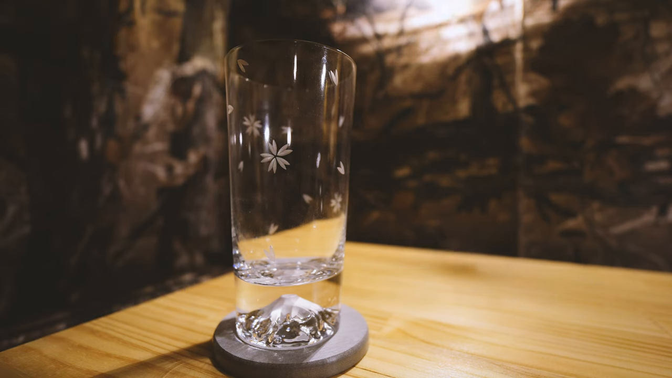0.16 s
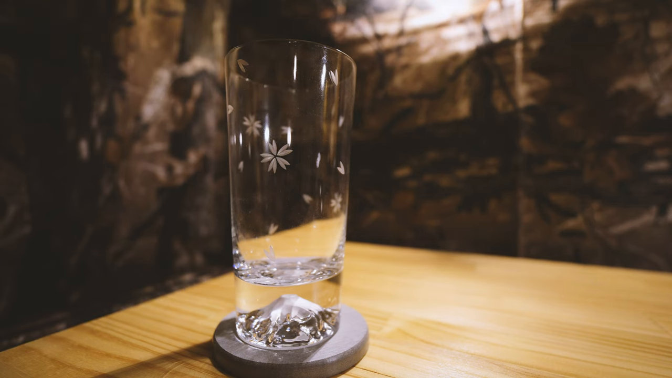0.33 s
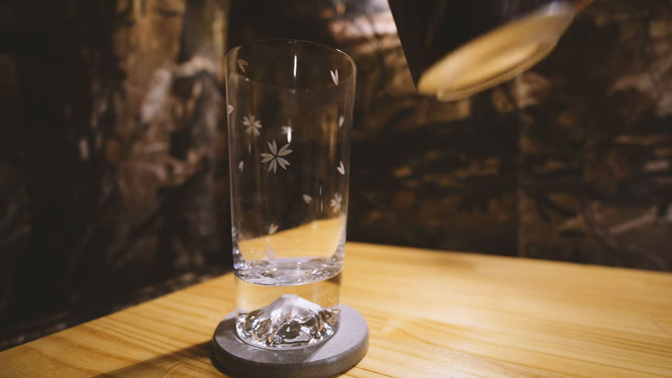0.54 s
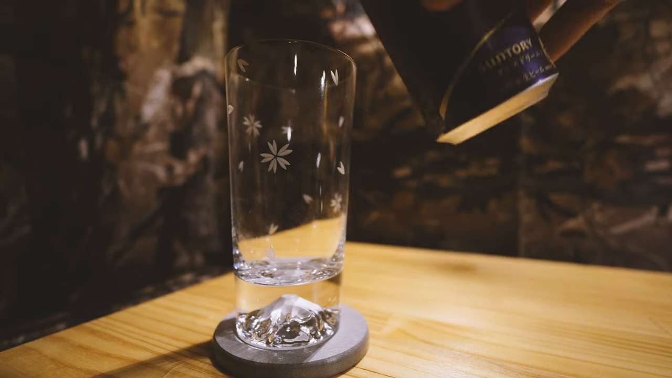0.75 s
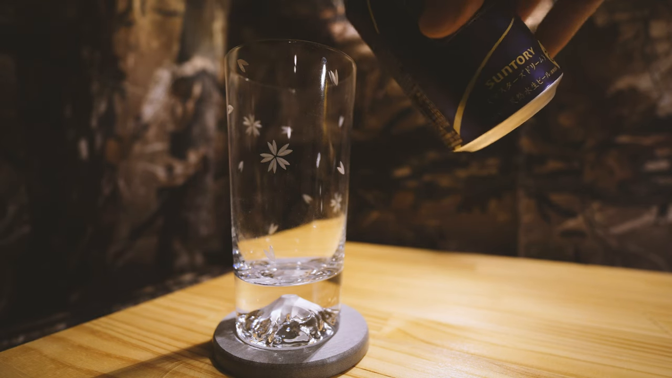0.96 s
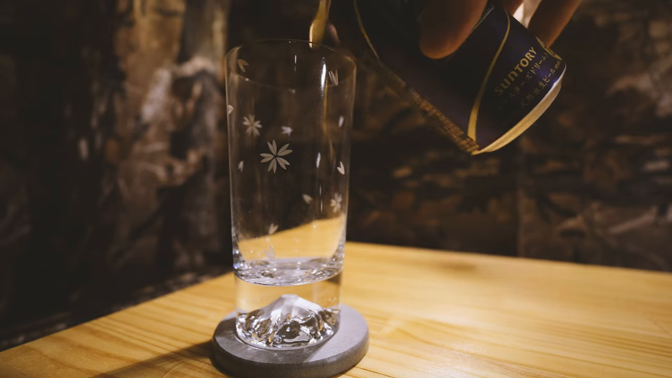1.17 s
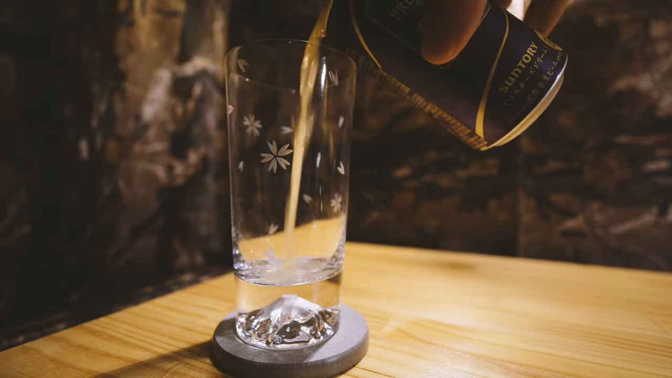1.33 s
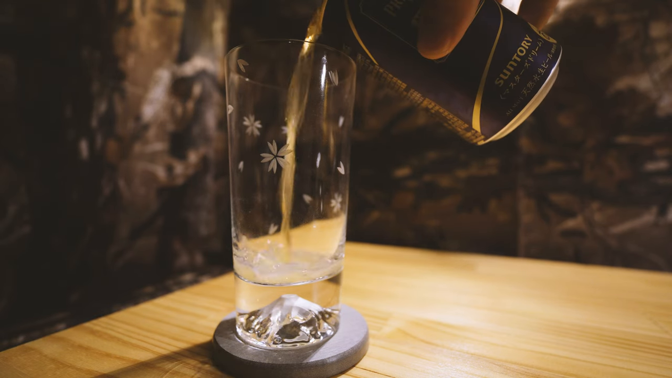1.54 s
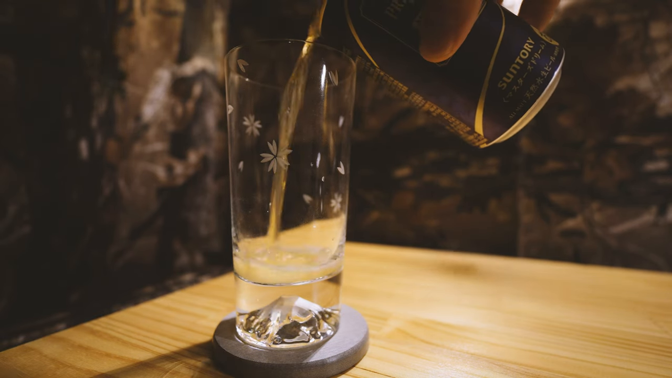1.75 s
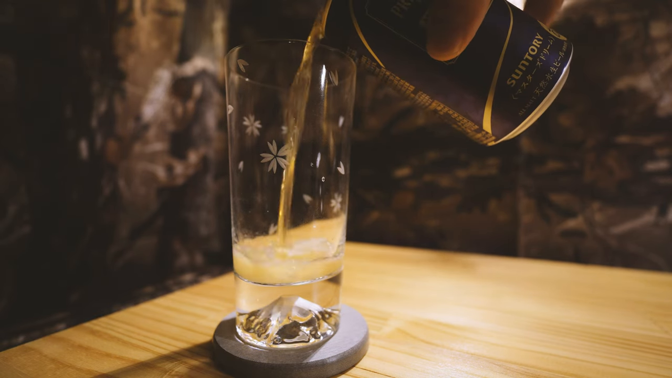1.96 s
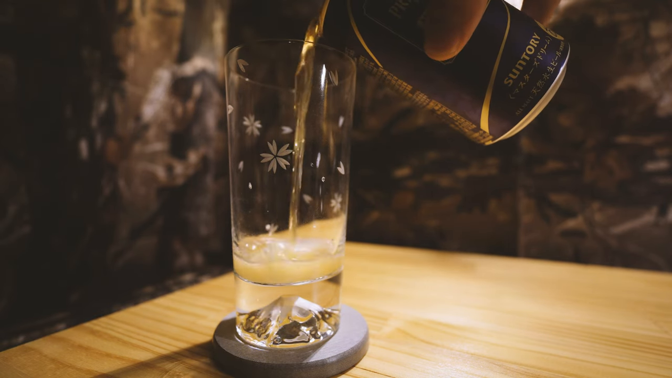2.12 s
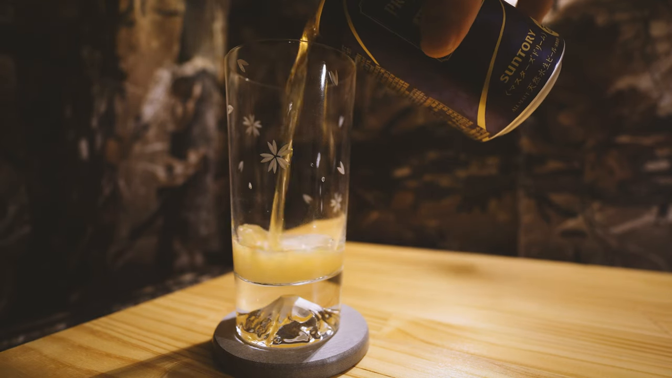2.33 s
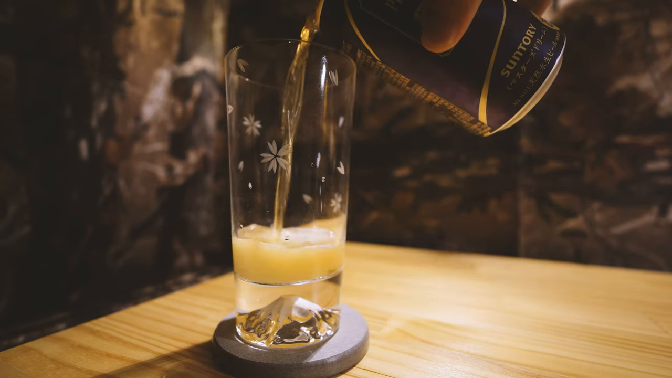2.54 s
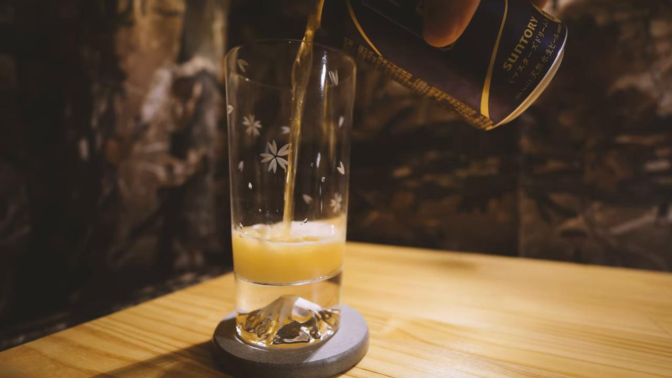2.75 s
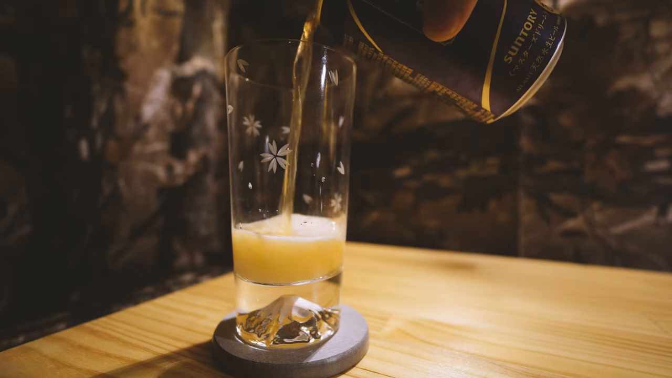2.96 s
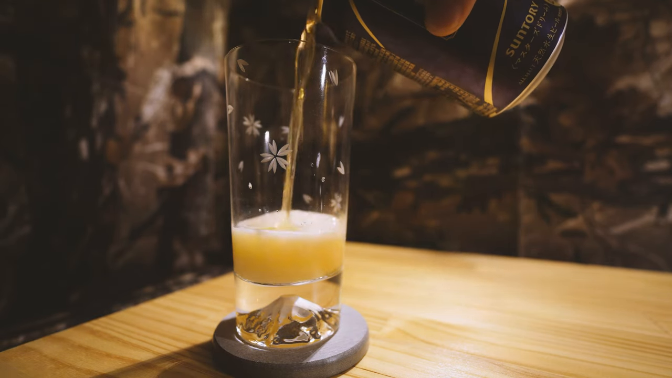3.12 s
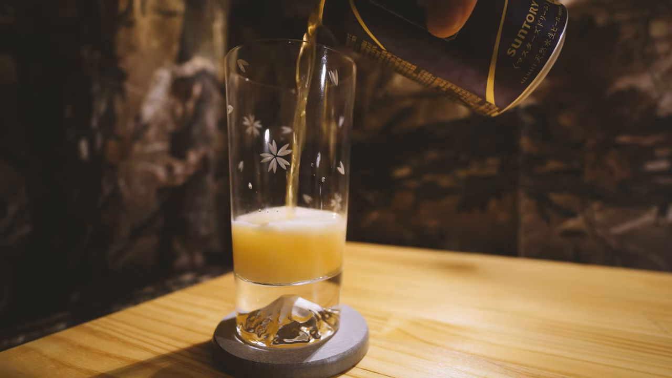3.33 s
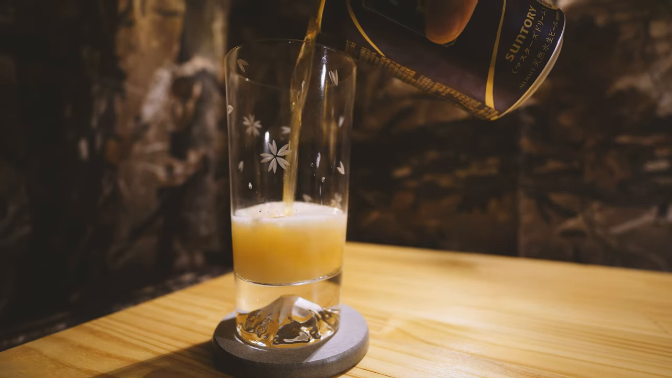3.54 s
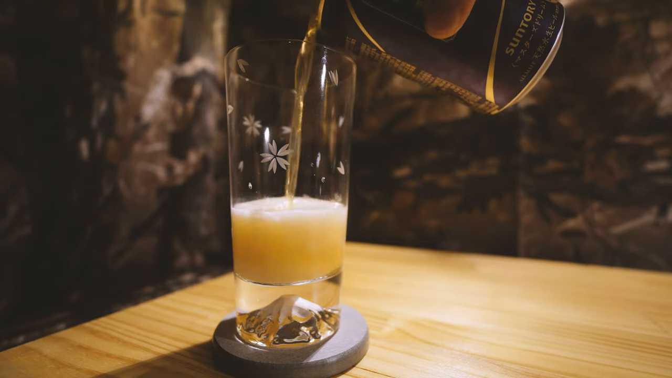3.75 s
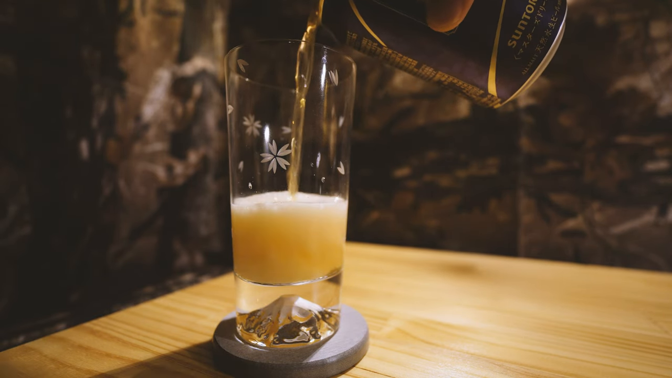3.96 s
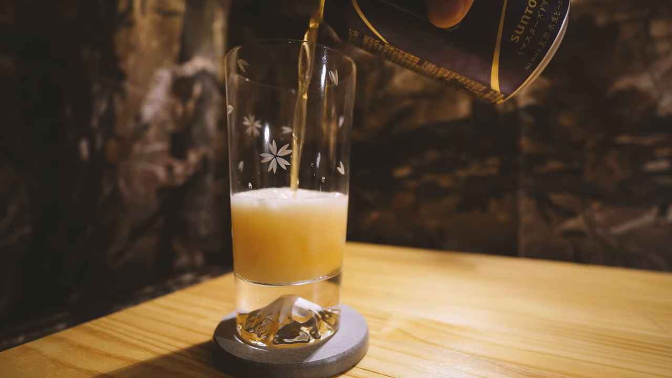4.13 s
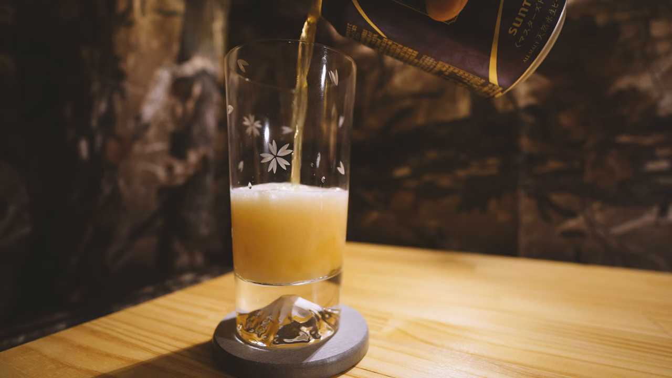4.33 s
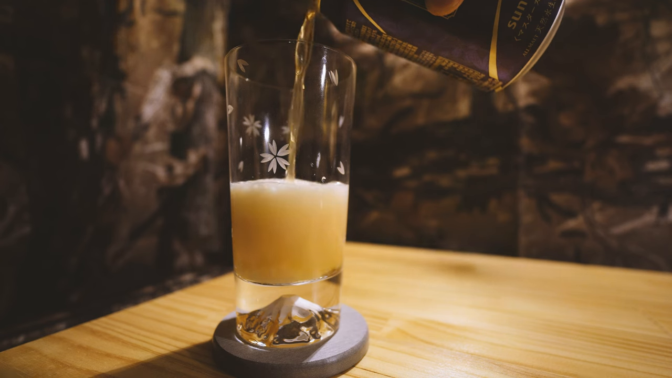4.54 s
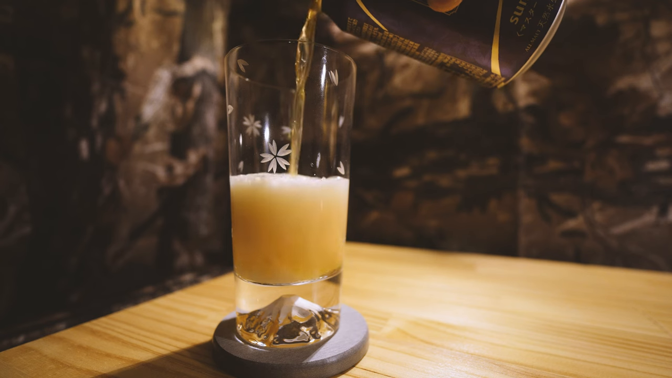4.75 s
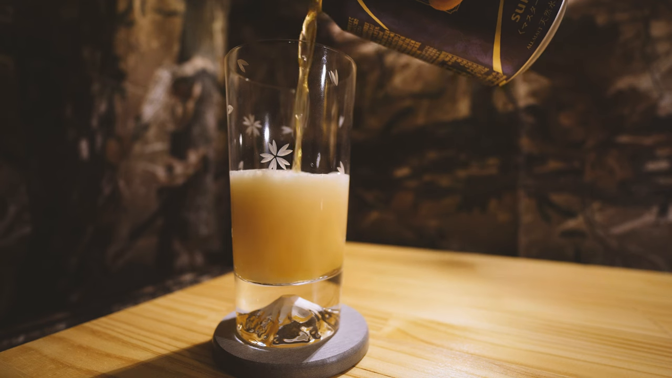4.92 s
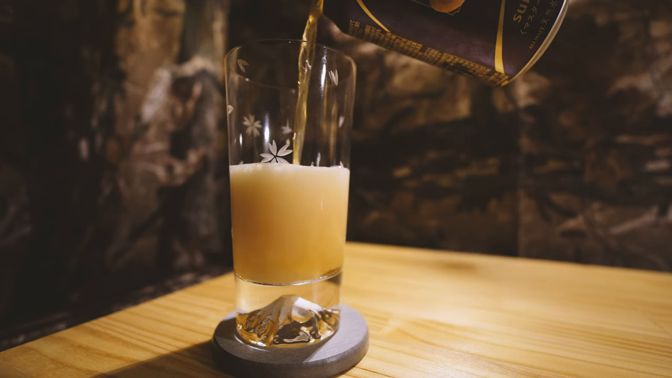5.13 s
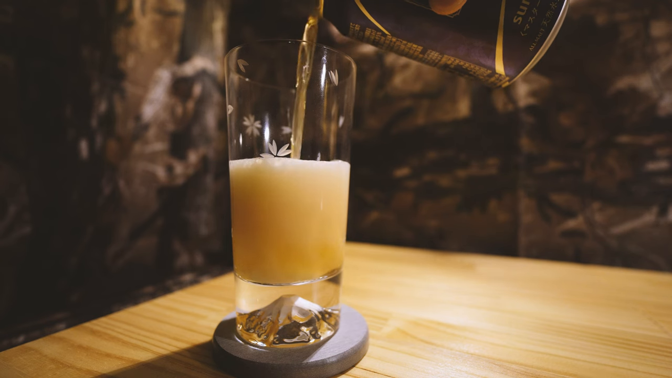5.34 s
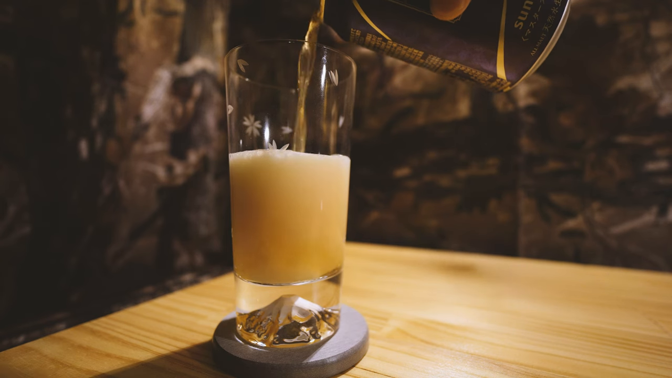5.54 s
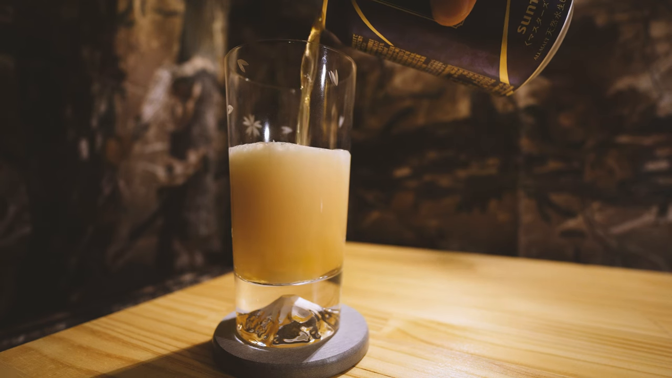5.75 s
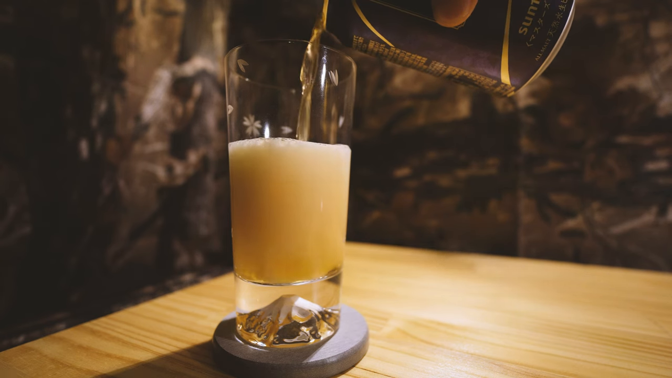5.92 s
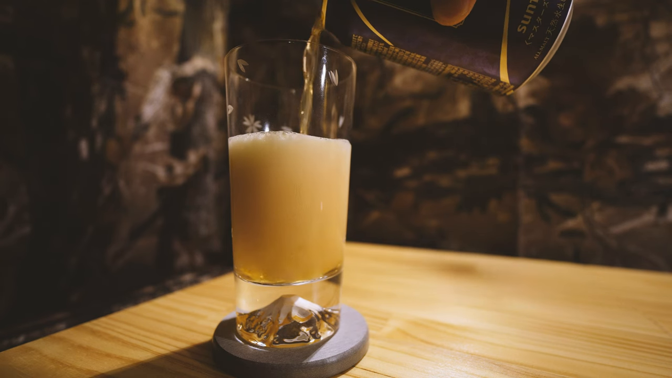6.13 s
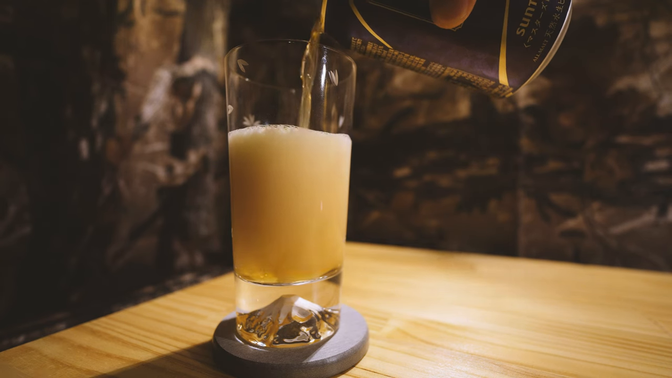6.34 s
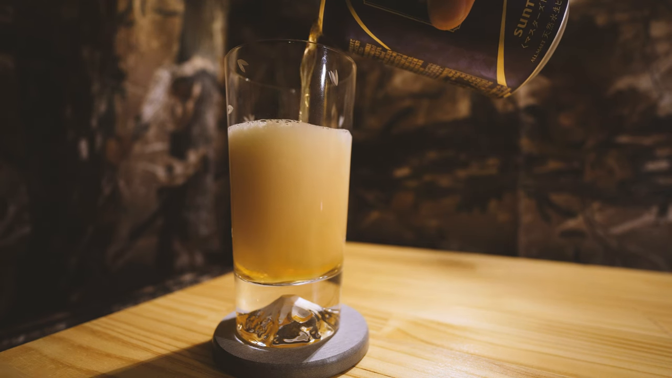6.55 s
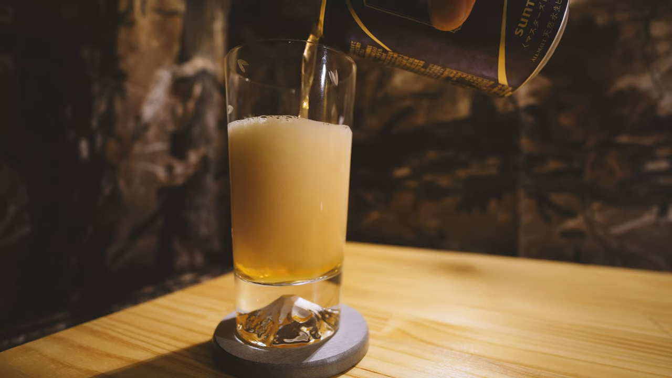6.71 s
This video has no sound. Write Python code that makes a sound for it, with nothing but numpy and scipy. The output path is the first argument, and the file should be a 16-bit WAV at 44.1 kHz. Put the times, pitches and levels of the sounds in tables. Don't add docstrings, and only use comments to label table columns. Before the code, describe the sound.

Beer from a can splashes onto a bare glass bottom, bubbles ring brightly, then soften into dull foamy pops in a small room.

```python
import sys
import numpy as np
from scipy import signal
from scipy.fft import rfft, irfft
from scipy.io import wavfile
from scipy.ndimage import uniform_filter1d

SR = 44100
rng = np.random.default_rng(int(sys.argv[2]) if len(sys.argv) > 2 else 0)


def wav_out(sig):
    wavfile.write(sys.argv[1], SR, np.round(np.clip(np.atleast_2d(sig).T, -1, 1) * 32767).astype(np.int16))


def invert_db(x):
    u = np.asarray(x, float) / 20
    return 10 ** u


N = 303401

# pitch_hz, level_db (per Hz)
FAN_COLOUR = [(110, -28.5), (170, -2), (300, -15), (550, -13.5), (900, -11), (1200, -8), (1700, -11),
              (1900, -22.5), (2600, -27), (4000, -29.5), (15650, -29), (15900, -48.5)]
# middle_s, low_level_db, upper_level_db, half_length_s
BUMPS = [
    (0.24, -63, -56.5, 0.049),
    (1.383, -56, -64, 0.04),
    (1.77, -51.5, -71, 0.061),
    (3.6, -67, -90, 0.69),
    (4.306, -78, -60, 0.78),
    (6.657, -56.5, -61, 0.2),
]
# start_s, level_db
GAS_PUFFS = [
    (0, -68),
    (.24, -66.5),
]
# middle_s, level_db, half_length_s
FAN_SURGE = (6.15, -56, 0.18)
# start_s, level_db, thud_db (compared with the crack)
CAN_TICKS = [
    (0.204, -20, -34),
    (0.223, -32, -30),
    (0.226, -20, -2.5),
]
# pitch_hz, width_hz, level_db
CAN_MODES = [(2050, 60, 3), (2250, 170, 9), (2680, 170, 11), (340, 90, -6), (1150, 100, -6), (4410, 220, 5),
             (10900, 610, 4)]
# time_s, vigour_db, cushion_db (highs softened by beer and foam)
STREAM = [(1.3, -79, -9), (1.7, -51, -2), (2.0, -36.5, 5), (2.25, -42.5, 2), (2.34, -39.5, 9),
          (2.5, -39.5, 12.5), (3.2, -32, 16.5), (3.5, -38, 18), (3.9, -45, 9), (4.3, -46.5, 15),
          (5.2, -50, 24), (6.0, -54, 38.5), (6.8, -74, 14)]
# time_s, pitch_hz
CAVITY = [(1.4, 2210), (1.82, 1950), (2.1, 1260), (2.45, 670), (2.72, 530), (2.88, 357), (3.6, 321),
          (4.1, 834), (4.5, 961), (6.8, 1110)]
# time_s, pitch_hz
AIR_COLUMN = [(1.4, 698), (2.3, 727), (3.0, 752), (3.8, 802.5), (6.8, 720)]
# time_s, cover_0_to_1
FOAM_COVER = [(3.5, 0.06), (4.4, 0.8)]
# pitch_hz, width_hz, level_db
GLASS_MODES = [(990, 320, -2.5), (1100, 45, -8.5), (2100, 55, -1.5), (2550, 120, -22.5), (3120, 160, -7),
               (4400, 170, -6)]
# pitch_hz, width_hz, level_db
CROSS_MODES = [(5150, 420, -6), (6365, 140, -1), (7680, 180, -4), (8700, 220, -1), (9050, 200, -2),
               (10340, 170, -1), (10930, 160, -4), (11250, 150, -4), (11910, 200, -1), (12650, 220, 1),
               (13600, 220, 0), (14600, 200, -4), (15140, 140, -4), (15520, 170, 0)]
# pitch_hz, width_hz, level_db
FOAM_MODES = [(2550, 180, 9), (2960, 130, 2.5), (3123, 91, 0.5), (4400, 220, 4)]
# time_s, level_db
INTAKE = [(1.32, -71), (1.35, -56.5), (1.8, -60), (2.3, -66.5), (4.0, -53), (5.0, -62.5), (6.0, -66),
          (6.8, -62.5)]
# start_s, level_db, spray_pitch_hz, bright_db (compared with the peak)
SPLATS = [(1.382, -27.5, 3280, -14), (1.407, -33, 3480, -19), (1.413, -17, 7200, -9.5),
          (1.432, -25, 8640, 6.5), (1.43, -25.5, 3080, -30), (1.442, -15.5, 3600, -31),
          (1.442, -15, 9600, -6.5), (1.453, -15, 10200, -9.5), (1.485, 1.5, 4400, -21),
          (1.5, -19, 11300, -3.5), (1.522, 0, 7030, -7), (1.527, -8.5, 9140, -15.5),
          (1.607, -23.5, 6700, 2.5), (1.631, -16.5, 4300, -34), (1.643, -20, 13510, -25),
          (1.6858, -25.5, 5860, -22), (1.708, -20.5, 7260, -21), (1.716, -13, 8200, -26),
          (1.779, -30, 8100, -10.5), (1.814, -14.5, 2140, -0.5), (1.824, -21.5, 4400, 5.5),
          (1.84, -20.5, 3720, -21), (1.901, -16, 3170, -15.5), (1.931, -9, 10600, -12),
          (1.952, -16.5, 8160, -15), (1.965, -17, 13140, 0), (1.987, -10, 3380, -4),
          (2.009, -18, 5700, -14.5), (2.031, -8.5, 4660, -22.5), (2.034, -9.5, 9970, -19),
          (2.05, -16, 3160, -18), (2.096, -22.5, 6250, 12), (2.117, -31, 2320, 6)]
# start_s, air_column_db, bubble_db, bubble_pitch_hz
BUBBLES = [(1.516, -34.5, -22, 1830), (1.611, -41, -29.5, 1430), (1.673, -66, -18.5, 2014),
           (1.716, -46, -36.5, 1200), (1.783, -42, -24.5, 1830), (1.814, -34, -12.5, 1650),
           (1.822, -54, -21, 1930), (1.83, -31.5, -27, 1230), (1.903, -52.5, -21, 2020),
           (1.929, -53, -16.5, 1970), (1.94, -28.5, -18.5, 1520), (1.969, -31.5, -20, 1330),
           (1.988, -24, -50, 1200), (2.032, -28.5, -39, 625), (2.042, -21.5, -17.5, 1014),
           (2.05, -33, -25, 990), (2.08, -52, -33, 1040), (2.116, -6.5, -5, 1044),
           (2.161, -56, -22.5, 1930), (3.421, -31, -29, 970), (3.651, -27, -30, 1000),
           (3.782, -29, -32, 1075), (3.818, -33, -30, 990),
           (2.189, -12.5, -20, 1170), (2.202, -22, -44, 1100), (2.214, -20.5, -38, 1160),
                  (2.225, -13.5, -30, 990), (2.262, -22, -45, 1006), (2.274, -16.5, -25, 1060),
                  (2.38, -27, -59, 660), (2.394, -17, -40, 650), (2.42, -14, -19.5, 1000),
                  (2.439, -21, -44, 650), (2.469, -16, -16, 662), (2.479, -17, -17.5, 650),
                  (2.49, -25, -18.5, 613), (2.5, -33, -24, 676), (2.525, -18, -18.5, 595),
                  (2.536, -16.5, -22, 598), (2.559, -12.5, -15.5, 644), (2.568, -29, -23, 526),
                  (2.601, -17.5, -37, 624), (2.608, -10, -11, 635), (2.625, -11, -17.5, 615),
                  (2.675, -17, -20.5, 530), (2.694, -28, -36, 546), (2.724, -19.5, -32, 564),
                  (2.77, -21.5, -24, 550), (2.818, -15, -20, 623), (3.037, -18.5, -30, 950),
                  (3.091, -23, -28, 586), (3.204, -24, -39, 590), (3.554, -28, -31, 613)]
# start_s, air_column_db, bubble_db
LARGE_GULPS = [(2.736, -25, -37), (2.791, -23, -25), (2.83, -17.5, -23.5), (2.84, -59, -37),
               (2.853, -23.5, -39), (2.864, -31, -49), (2.924, -41, -30.5), (2.951, -23.5, -46),
               (2.975, -17, -22), (3.005, -45, -44), (3.027, -20.5, -21), (3.1, -16.5, -21.5),
               (3.11, -36, -34), (3.135, -28, -23.5), (3.142, -26, -49), (3.154, -23, -44),
               (3.179, -14.5, -28), (3.189, -21, -45), (3.214, -37, -29), (3.273, -17.5, -25),
               (3.295, -19.5, -25), (3.436, -24, -32), (3.447, -16, -24), (3.476, -25, -25),
               (3.499, -17, -44), (3.525, -27, -33), (3.576, -21, -30.5), (3.617, -25, -35.5),
               (3.756, -19.5, -58)]
# start_s, level_db, strongest_pitch_hz, coarse_drops_db
SPRAYS = [(2.1155, -23.5, 9000, -40), (2.1425, -25, 13300, -33.5), (2.1617, -13, 14600, -34.5),
          (2.2016, -44, 8770, -31), (2.2435, -23.5, 10000, -37), (2.3934, -36, 15600, -50),
          (2.3926, -18.5, 9400, -41), (2.4182, -29, 9010, -32.5), (2.436, -24, 15500, -48),
          (2.478, -27, 9400, -46), (2.478, -33, 15500, -41), (2.523, -12, 15900, -38),
          (2.563, -29, 9020, -44), (2.5953, -18.5, 15500, -39), (2.6033, -24, 8500, -31),
          (2.6746, -29, 11850, -45), (2.629, -33, 13000, -54), (2.723, -23, 12100, -46),
          (2.772, -31, 12300, -38), (2.788, -30, 9500, -41), (2.8295, -43, 12600, -42),
          (2.852, -9.5, 11500, -32), (2.9001, -44, 8690, -36), (2.921, -24, 12600, -35),
          (2.951, -25, 12700, -42), (2.9751, -24, 10000, -30.5), (3.006, -43, 12700, -51),
          (3.027, -34, 8600, -34), (3.0762, -40, 12000, -39.5), (3.0971, -31, 9300, -39),
          (2.645, -35, 13000, -43.5), (3.1525, -32, 8850, -47), (3.179, -31, 15500, -35),
          (3.2046, -29, 12500, -44), (3.229, -29, 12000, -44), (3.2567, -15.5, 9900, -55),
          (3.295, -29, 12500, -39.5), (3.417, -34, 13500, -58), (3.442, -26.5, 11700, -36),
          (3.4763, -27, 9600, -47), (3.4983, -26.5, 14800, -44), (3.5521, -40, 13600, -44.5),
          (3.5601, -41, 8700, -58), (3.574, -23.5, 14600, -60), (3.599, -51, 11600, -47),
          (3.6195, -21, 12100, -38), (3.6509, -28, 14600, -59), (3.7043, -35.5, 10800, -68),
          (2.696, -38, 11900, -43.5), (3.7501, -33.5, 11200, -64)]
# start_s, level_db, spray_pitch_hz
STRAY_DROPS = [
    (3.985, -34, 7840),
    (4.0126, -57, 7760),
    (4.033, -27.5, 7800),
    (4.099, -31.5, 14800),
    (4.12, -34.5, 7700),
    (4.232, -29.5, 13300),
    (6.2685, -40.5, 14700),
]
# start_s, level_db, strongest_pitch_hz
PINCHES = [(2.116, -23, 1990), (2.1466, -26, 2070), (2.1848, -25, 2040), (2.2139, -20, 3140),
           (2.2462, -28.5, 2050), (2.271, -28, 2040), (2.318, -38, 3160), (2.3279, -36, 2090),
           (2.3796, -35.5, 2030), (2.392, -32, 3240), (2.4168, -29, 2150), (2.4366, -34, 1930),
           (2.4686, -33, 1800), (2.477, -30, 2130), (2.497, -35, 2050), (2.5228, -35, 2090),
           (2.555, -34.5, 2140), (2.6018, -32, 1830), (2.6077, -24, 2080), (2.6254, -24.5, 2090),
           (2.6764, -38, 2050), (2.6947, -29.5, 3060), (2.7225, -34, 2100), (2.737, -33.5, 2070),
           (2.7688, -24, 2080), (2.7908, -31, 2070), (2.8178, -31.5, 2090), (2.8492, -30.5, 1940),
           (2.8612, -32, 2170), (2.9192, -34.5, 2130), (2.951, -29, 2050), (2.9748, -25.5, 2090),
           (3.0326, -45, 3100), (3.1, -28, 2080), (3.1169, -22.5, 2550), (3.1793, -24, 2520),
           (3.2046, -27, 2120), (3.2564, -35, 2570), (3.2703, -21.5, 2180), (3.2947, -32, 2540),
           (3.3303, -35, 2570), (3.3805, -34.5, 2150), (3.437, -26, 2600), (3.447, -28, 2090),
           (3.4753, -26, 2080), (3.4975, -25, 2080), (3.575, -32, 2460), (3.6209, -30.5, 2550),
           (3.7554, -32, 2560)]
# start_s, level_db, bubble_pitch_hz, upper_modes_db
FOAM_POPS = [(3.818, -36, 789, -49.5), (3.866, -36, 780, -67), (3.956, -36, 750, -48),
             (3.979, -23.5, 740, -50), (4.052, -25, 794, -57), (3.917, -37, 780, -48.5),
             (4.095, -25, 755, -52), (4.12, -38, 1070, -49), (4.134, -20.5, 870, -57),
             (4.156, -32.5, 616, -61), (4.183, -36, 915, -57), (4.232, -29.5, 950, -55),
             (4.245, -27, 950, -64), (4.264, -26.5, 900, -58), (4.31, -35, 1050, -51),
             (4.346, -31, 947, -54), (4.373, -31.5, 1000, -55), (4.465, -31, 957, -56.5),
             (4.496, -37, 1010, -62.5), (4.513, -28.5, 910, -55), (4.565, -26, 980, -56.5),
             (4.601, -37, 1030, -55), (4.658, -26.5, 956, -56.5), (4.672, -29.5, 980, -52.5),
             (4.035, -28, 900, -46.5), (4.772, -29.5, 1030, -59), (4.805, -24.5, 920, -53.5),
             (4.859, -32.5, 1060, -59), (4.894, -24.5, 1090, -54), (4.917, -30.5, 1060, -60),
             (4.973, -24.5, 1040, -53.5), (5.039, -43, 990, -75.5), (5.065, -31.5, 1080, -59.5),
             (5.103, -25, 988, -52.5), (5.148, -31.5, 1080, -69), (5.226, -31.5, 974, -71),
             (5.276, -35.5, 1090, -71), (5.315, -34, 1056, -70), (5.389, -29.5, 1060, -67.5),
             (5.464, -31, 1100, -61.5), (5.55, -46.5, 980, -75), (5.724, -41, 1100, -74),
             (5.841, -42, 740, -80), (5.855, -30.5, 1100, -80)]
# start_s, level_db
DRIPS = [
    (5.967, -24.5),
    (6.268, -28.5),
]
# pitch_hz, width_hz
NOTCHES = [(470, 40), (880, 120), (2260, 240)]

COLUMN_WIDTH_HZ = 57
GULP_HZ, GULP_WIDTH_HZ = 333, 33
MODE_SCATTER_DB = 5


def unit(x):
    return x / np.sqrt(np.mean(x ** 2) + 1e-20)


def peak_one(x):
    return x / (np.max(np.abs(x)) + 1e-20)


def even(x):
    return x / np.sqrt(uniform_filter1d(x ** 2, size=SR // 2) + 1e-20)


def at(curve, s):
    return np.interp(s, *np.transpose(curve))


def in_time(rows):
    s, *columns = np.transpose(rows)
    return [np.interp(np.arange(N) / SR, s, column) for column in columns]


def add(out, s, sound):
    i = round(s * SR)
    out[i:i + len(sound)] += sound[:N - i]


def band(x, low_hz, high_hz):
    limits = [low_hz, min(high_hz, SR * 9 / 20)]
    return signal.sosfilt(signal.butter(2, limits, "band", fs=SR, output="sos"), x)


def resonance(x, hz, width_hz):
    r = np.exp(-np.pi * width_hz / SR)
    feed = np.array([1, 0, -1]) * (1 - r * r) / 2
    return signal.lfilter(feed, [1, -2 * r * np.cos(2 * np.pi * hz / SR), r * r], x)


def through(x, modes):
    return sum(invert_db(db) * resonance(x, hz, width_hz) for hz, width_hz, db in modes)


def drift(rate):
    knots = rng.standard_normal(int(N / SR * 40) + 2)
    return np.interp(np.arange(N) / SR * rate, np.arange(len(knots)), knots)


def grains(per_s, spread_db):
    sizes = invert_db(spread_db * np.minimum(rng.exponential(1, N), 3.2))
    sizes = sizes * rng.choice([-1, 1], N)
    likely = per_s * invert_db(4.0 * drift(18)) / SR
    return sizes * (rng.random(N) < likely) + 1e-18


def burst(t60, tail_db, tail_t60):
    t = np.arange(SR // 8) / SR
    fade = invert_db(-60 * t / t60) + invert_db(tail_db - 60 * t / tail_t60)
    return fade * (1 - np.exp(-t / 0.00018))


def bubble(hz, cycles, rise, swell=0.95, squeeze=0):
    turns = np.arange(SR // 8) / SR * hz
    phase = turns * (1 + rise * turns) + squeeze * (1 - np.exp(-turns / 0.91))
    return np.sin(2 * np.pi * phase) * invert_db(-60 * turns / cycles) * (1 - np.exp(-turns / swell))


def wake(x, power):
    after = signal.lfilter([1], [1, -np.exp(-1 / (0.017 * SR))], np.abs(x))
    return (after / (uniform_filter1d(after, size=SR // 3) + 1e-9) + 0.12) ** power


def fan_surge(air):
    s, db, half_s = FAN_SURGE
    swell = np.exp(-((np.arange(N) / SR - s) / half_s) ** 2)
    return invert_db(db) * swell * band(air, 310, 1900)


def rumble(white):
    t = np.arange(N) / SR
    low, upper = invert_db(-56.5 - 0.2 * t), invert_db(-70.5)
    for s, low_db, upper_db, half_s in BUMPS:
        swell = np.exp(-((t - s) / half_s) ** 2)
        low = low + invert_db(low_db) * swell
        upper = upper + invert_db(upper_db) * swell
    deep = unit(band(band(white, 40, 190), 51, 140))
    return invert_db(1.5 * drift(9)) * (low * deep + upper * unit(band(white, 140, 630)))


def fizz(white):
    t, settle_t60_s = np.arange(N) / SR, 1.4
    gas = invert_db(-74.5)
    for s, db in GAS_PUFFS:
        gas = gas + invert_db(db - 60 * (t - s) / settle_t60_s) * (t >= s)
    return gas * unit(band(band(white, 9600, 11800), 9000, 12500))


def room_tone():
    white = rng.standard_normal((3, N))
    hz, db = np.transpose(FAN_COLOUR)
    colour = invert_db(np.interp(np.log(np.fft.rfftfreq(N, 1 / SR) + 1), np.log(hz), db))
    air = unit(irfft(rfft(white[0]) * colour, N))
    vent = sum(invert_db(-2.54 + 3.5 * drift(1.9)) * resonance(air, hz, 36) for hz in (950, 1160, 1450, 1730))
    air = air + vent
    return invert_db(-56.5 + 0.4 * drift(3.8)) * air + fan_surge(air) + rumble(white[1]) + fizz(white[2])


def can_ticks():
    out, shape = np.zeros(N), burst(0.021, -20.0, 0.1)
    noises = rng.standard_normal((len(CAN_TICKS), len(shape)))
    for (s, db, thud_db), noise in zip(CAN_TICKS, noises):
        snap = noise * shape + 3.5 * (np.arange(len(shape)) == 4)
        crack = through(snap, CAN_MODES) + invert_db(-5.5) * band(snap, 3200, 13400)
        thud = invert_db(thud_db) * bubble(91.0, 4.0, rise=0)
        add(out, s, invert_db(db) * (peak_one(crack) + thud))
    return out


def glass(x, column_hz, direct_db):
    steps, step = np.linspace(column_hz.min(), column_hz.max(), 5, retstep=True)
    column = np.zeros(N)
    for hz in steps:
        nearness = np.maximum(1 - np.abs(column_hz - hz) / step, 0)
        column += resonance(x, hz, COLUMN_WIDTH_HZ) * nearness
    return through(x, GLASS_MODES) + invert_db(9.5) * column + invert_db(direct_db) * x


def gurgle(clicks, cover):
    size_hz, column_hz = in_time(CAVITY)[0], in_time(AIR_COLUMN)[0]
    dealt, swarm = rng.integers(0, 12, N), np.zeros(N)
    for k, hz in enumerate(np.geomspace(300, 1800, 12)):
        likely = invert_db(-13 * np.log2(hz / size_hz) ** 2) + invert_db(-15)
        swarm += resonance(clicks * (dealt == k) * likely, hz, 0.18 * hz) / np.sqrt(hz)
    ringing = glass(swarm, column_hz, direct_db=-9) * (1 - 0.81 * cover)
    muffled = through(through(swarm, GLASS_MODES[:2]), GLASS_MODES[:2])
    deeper = resonance(swarm, 630, 210)
    gulping = (GULP_HZ / size_hz) ** 0.6 * resonance(swarm, GULP_HZ, GULP_WIDTH_HZ)
    return even(ringing + cover * (invert_db(6.5) * muffled + invert_db(-0.5) * deeper) + invert_db(1.5) * gulping)


def patter(drops, cover):
    direct = band(band(drops, 1500, 3400), 1500, 3400) * invert_db(-9)
    tops = band(drops, 1100, 3100)
    lower = (direct + through(tops, GLASS_MODES[2:3])) * (1 - 0.21 * cover)
    upper = through(through(tops, GLASS_MODES[3:]), GLASS_MODES[3:])
    return even(lower + invert_db(8.5) * upper)


def stream(plop_sound, splat_sound):
    vigour_db, cushion_db = in_time(STREAM)
    cover = in_time(FOAM_COVER)[0]
    patter_db = vigour_db + 0.5 - 0.97 * cushion_db - 4 * cover
    spray_db = vigour_db - 3 - 1.39 * cushion_db
    clicks = grains(1700, spread_db=9.5 - 5 * cover)
    drops = unit(grains(700, spread_db=11.5)) + invert_db(-7.5) * even(clicks)
    mist = grains(1500, spread_db=4.5)
    hiss = band(mist, 3500, 16000)
    spray = even(invert_db(-2.5) * hiss + through(hiss, CROSS_MODES))
    crackle = even(through(through(unit(mist) + invert_db(-6.0) * drops, FOAM_MODES), FOAM_MODES))
    crackle = invert_db(-21.5) * np.sqrt(cover / FOAM_COVER[-1][1]) * crackle
    out = invert_db(vigour_db) * gurgle(clicks, cover) * wake(plop_sound, 0.12)
    out += invert_db(patter_db) * patter(drops, cover) * wake(plop_sound, 0.39)
    out += invert_db(spray_db) * spray * wake(splat_sound, 0.5)
    out += invert_db(vigour_db) * crackle * wake(plop_sound, 0.33)
    return out * (np.arange(N) > STREAM[0][0] * SR)


def intake():
    hz, width_hz = 317.6, 78
    hum = resonance(grains(300, spread_db=10.0), hz, width_hz)
    return invert_db(in_time(INTAKE)[0]) * even(resonance(hum, hz, 1.6 * width_hz))


def splats():
    out, shape = np.zeros(N), burst(0.021, -18.0, 0.06)
    noises = rng.standard_normal((len(SPLATS), 2, len(shape)))
    brights = band(noises[:, 1] * shape, 6182, 16110)
    for (s, db, hz, bright_db), noise, bright in zip(SPLATS, noises, brights):
        splash = noise[0] * shape
        core = resonance(splash + 5.6 * (np.arange(len(shape)) == 20), hz, 0.04 * hz)
        skirt = band(splash, max(0.23 * hz, 2100), 2.0 * hz)
        parts = invert_db(-5.0) * peak_one(core) + invert_db(-8.5) * peak_one(skirt)
        parts = parts + invert_db(bright_db - 4.0) * peak_one(bright)
        add(out, s - .0002, invert_db(db) * parts)
    out = invert_db(-4.5) * out + invert_db(-3.5) * through(out, CROSS_MODES) + sprays()
    softened = signal.sosfilt(signal.cheby1(8, .5, 15700, fs=SR, output="sos"), out)
    return softened + invert_db(-23.5) * out


def pinch_clicks():
    click = band(-bubble(1934.0, 1.16, rise=0), 1580, 3900)
    return click, band(click, 1000, 4100)


def pinch(clicks, strengths_db):
    modes = [(hz, width, db + extra) for (hz, width, db), extra in zip(GLASS_MODES[2:], strengths_db)]
    return peak_one(through(clicks[0], modes) + invert_db(-13) * clicks[1])


def bubble_plops():
    out, clicks = np.zeros(N), pinch_clicks()
    gulps = [(*row, at(CAVITY, row[0])) for row in LARGE_GULPS]
    rows = BUBBLES + gulps
    for (s, column_db, bubble_db, hz), chance in zip(rows, rng.standard_normal((len(rows), 7))):
        big = hz < 500
        cycles = (22.0 if hz < 800 else 13.0) * 2 ** (.15 * chance[0])
        pulse = bubble(hz * (1 + 0.05 * chance[1] * big), cycles, rise=0.0036, squeeze=0.39 * big)
        body = pulse + invert_db(-13.5) * resonance(pulse, GULP_HZ, GULP_WIDTH_HZ)
        column_hz = at(AIR_COLUMN, s) + 8 * chance[2]
        kick = resonance(bubble(column_hz, 12.0, rise=0, swell=0.59), column_hz, 340)
        open_air = max(1 - 0.7 * at(FOAM_COVER, s) / 0.13, 0)
        column = kick + invert_db(3.0) * open_air * resonance(kick, column_hz, COLUMN_WIDTH_HZ)
        add(out, s, invert_db(bubble_db) * peak_one(body) + invert_db(column_db) * peak_one(column))
        if s < PINCHES[0][0]:
            tick = pinch(clicks, MODE_SCATTER_DB * chance[3:])
            add(out, s, invert_db(max(column_db, bubble_db) - 4) * tick)
    return out


def sprays():
    out, shape = np.zeros(N), burst(0.011, -11.0, 0.067)
    shape = shape * (1 - np.exp(-np.arange(len(shape)) / SR / 0.00053))
    rows = SPRAYS + [(*row, row[1] - 31) for row in STRAY_DROPS]
    noises = rng.standard_normal((len(rows), 3, len(shape)))
    steps = np.repeat(noises[:, 2, ::40], repeats=40, axis=1)[:, :len(shape)]
    lumps = shape * invert_db(4.0 * steps)
    wides = band(noises[:, 0] * lumps, 8000, 17600)
    coarses = band(noises[:, 1] * lumps, 4230, 8270)
    for (s, db, hz, coarse_db), noise, lump, wide, coarse in zip(rows, noises, lumps, wides, coarses):
        fine = band(noise[0] * lump, 0.83 * hz, 1.234 * hz) + invert_db(-2.5) * wide
        modes = [(mode_hz, width, mode_db + MODE_SCATTER_DB * extra)
                 for (mode_hz, width, mode_db), extra in zip(CROSS_MODES, noise[2, ::-1])]
        fine = peak_one(invert_db(-8) * fine + through(fine, modes))
        coarse = peak_one(invert_db(-8) * coarse + through(coarse, modes))
        add(out, s, invert_db(db - 2) * fine + invert_db(coarse_db + 6) * coarse)
    return out


def pinch_ticks():
    out, clicks = np.zeros(N), pinch_clicks()
    upper_hz = np.array(GLASS_MODES)[2:, 0]
    for s, db, hz in PINCHES:
        strengths_db = -15 * np.abs(np.log2(upper_hz / hz))
        add(out, s + 0.000877, invert_db(db + 5.5) * pinch(clicks, strengths_db))
    return out


def gulp_knocks():
    out = np.zeros(N)
    ringing = through(-bubble(1120.0, 10.0, rise=0), GLASS_MODES[:2])
    knock = peak_one(ringing - invert_db(-2.0) * bubble(1290.0, 4.5, rise=0))
    for s, column_db, _ in LARGE_GULPS:
        add(out, s - .001, invert_db(column_db - 12) * knock)
    return out


def foam_pops():
    out, click = np.zeros(N), band(bubble(2030.0, 2.9, rise=0), 2000, 5400)
    chances = rng.standard_normal((len(FOAM_POPS), 4))
    for (s, db, hz, tick_db), chance in zip(FOAM_POPS, chances):
        pulse = bubble(hz, 6.2, rise=0.0016)
        body = through(pulse, GLASS_MODES) + invert_db(1.0) * pulse
        modes = [(mode_hz, width, mode_db + 6.0 * extra)
                 for (mode_hz, width, mode_db), extra in zip(FOAM_MODES, chance)]
        muffled = peak_one(through(click, modes))
        add(out, s, invert_db(db - 2.5) * peak_one(body) + invert_db(tick_db + 11.5) * muffled)
    return out


def drips():
    out, shape = np.zeros(N), burst(0.009, -27, 0.026)
    plop = peak_one(bubble(1130, 5, rise=0.0043))
    for (s, db), noise in zip(DRIPS, rng.standard_normal((len(DRIPS), len(shape)))):
        crack = peak_one(band(noise * shape, 1500, 9200))
        add(out, s, invert_db(db) * (plop + invert_db(-23) * crack))
    return out


def walls(x):
    out = np.zeros(N)
    for delay_s, db in [(.0031, -19.5), (.0085, -23), (.016, -22), (.027, -30), (.041, -28.5)]:
        add(out, delay_s, invert_db(db) * x)
    return out


def scene():
    plop_sound = bubble_plops() + pinch_ticks() + gulp_knocks() + foam_pops()
    splat_sound = splats()
    beer = plop_sound + stream(plop_sound, splat_sound)
    deep = np.clip((np.arange(N) / SR - 2.2) / 1.5, 0, 1)
    beer = beer - 0.88 * deep * resonance(beer, 3560, 990)
    near = band(beer + splat_sound + drips(), 310, 19540)
    for hz, width_hz in NOTCHES:
        near = near - 0.87 * resonance(near, hz, width_hz)
    near = near + can_ticks() + intake()
    return (near + walls(near) + room_tone())[None]


def top_cut(x):
    return signal.sosfilt(signal.butter(12, 16990, fs=SR, output="sos"), x)


def record(dry):
    mix = signal.sosfilt(signal.cheby2(10, 50, 16950, fs=SR, output="sos"), dry)
    return top_cut(mix)


dry = scene()
out = record(dry)
wav_out(out)
```